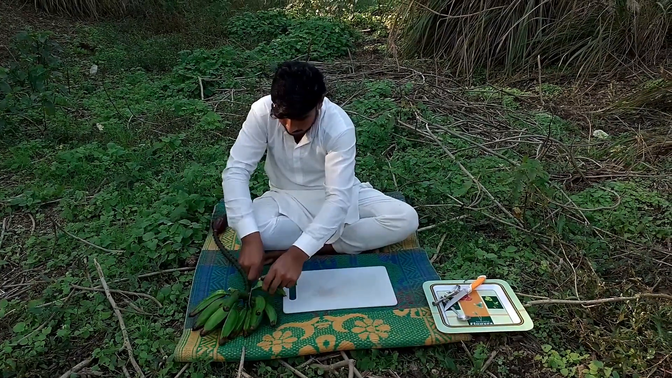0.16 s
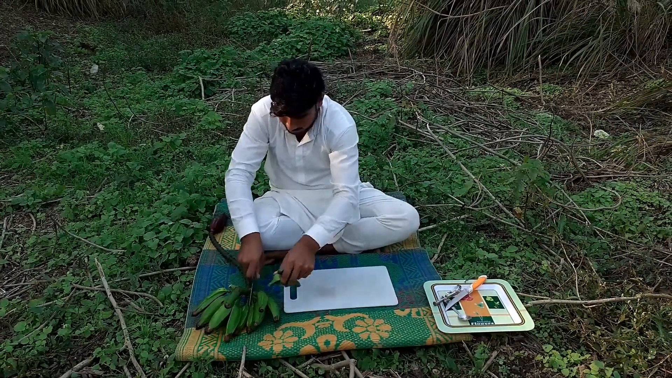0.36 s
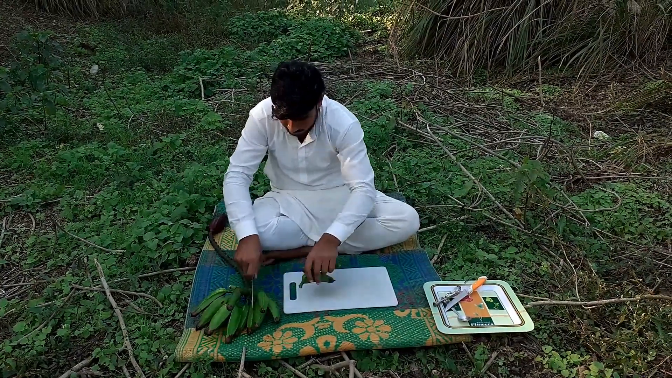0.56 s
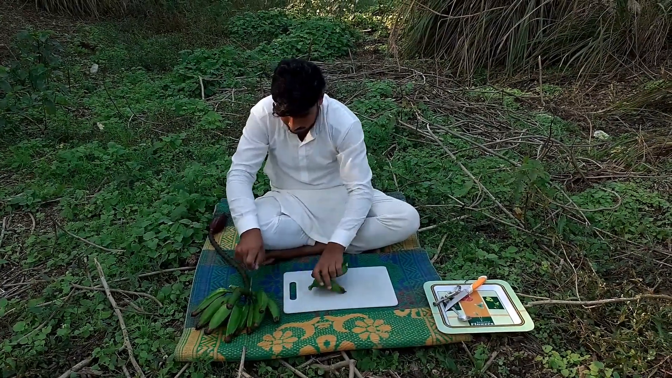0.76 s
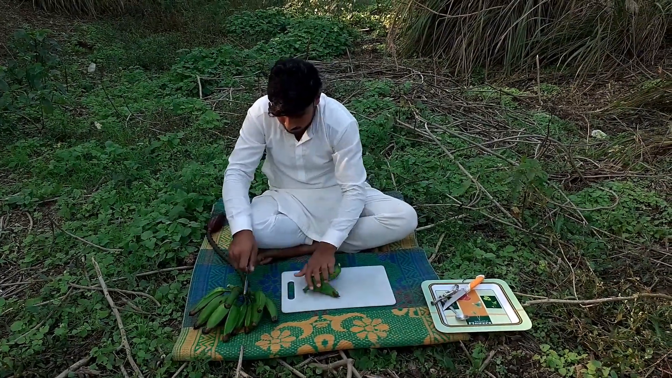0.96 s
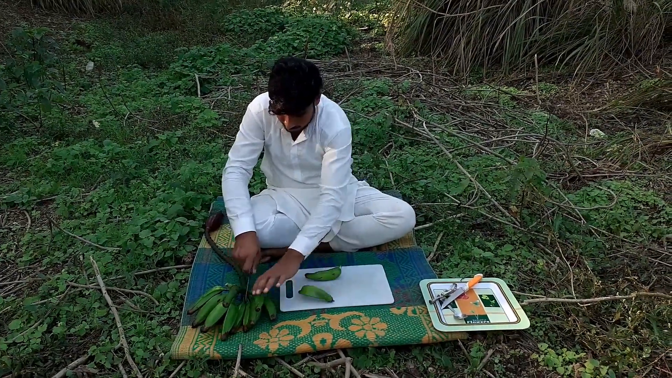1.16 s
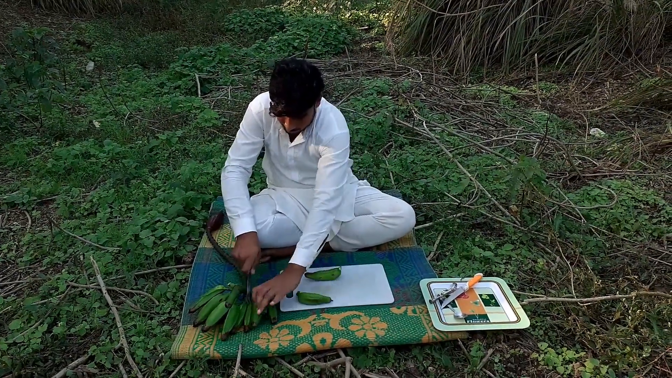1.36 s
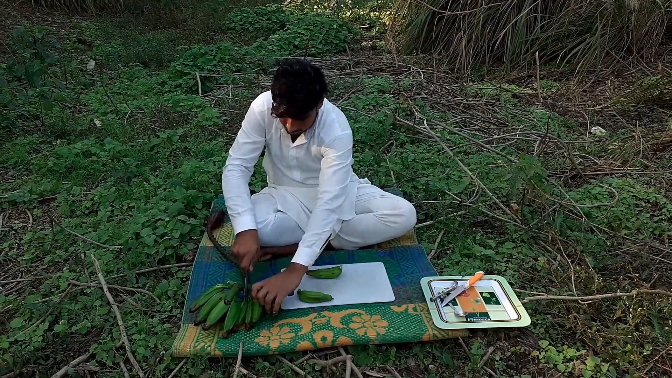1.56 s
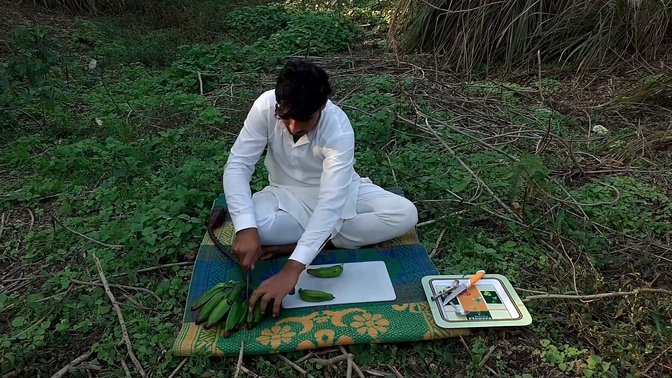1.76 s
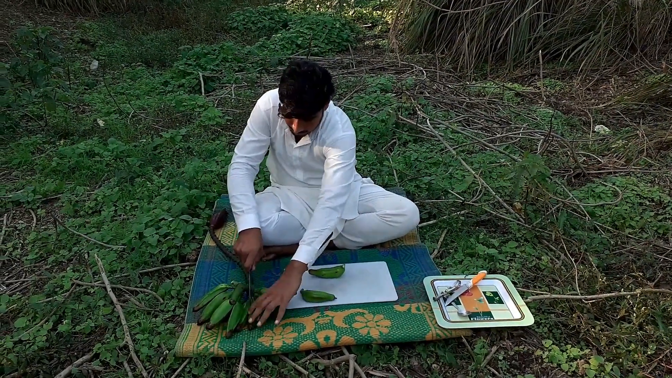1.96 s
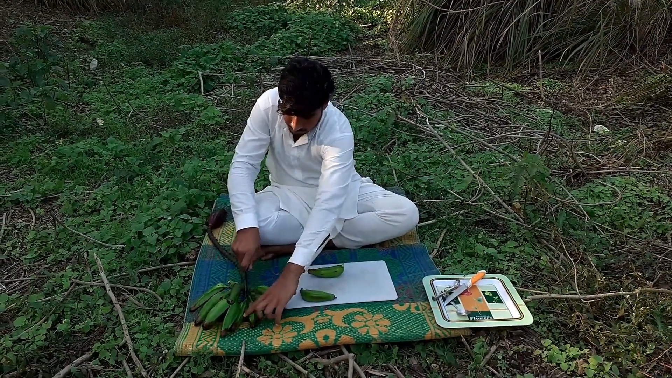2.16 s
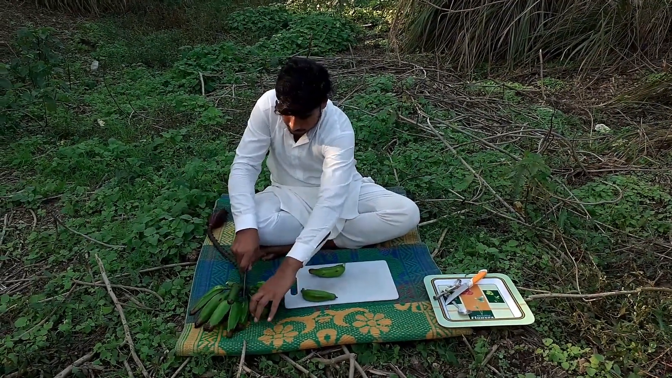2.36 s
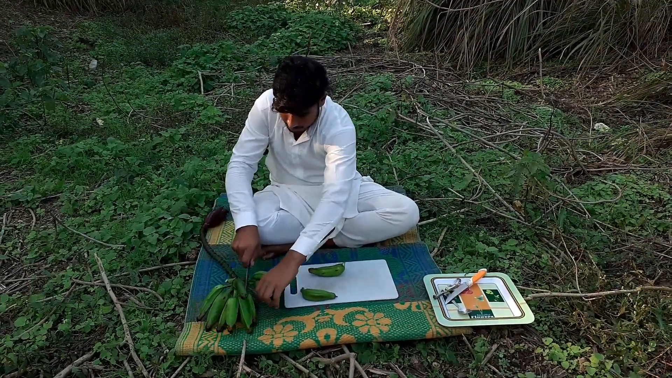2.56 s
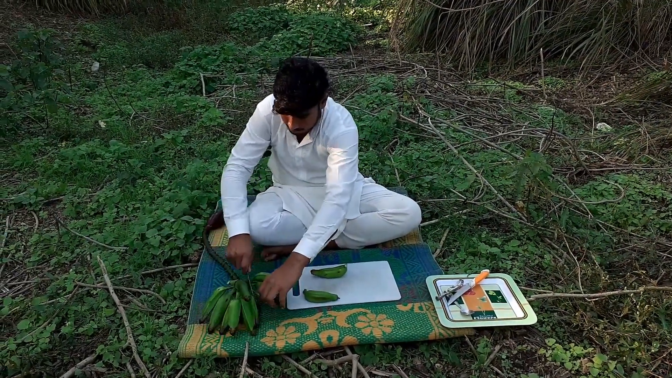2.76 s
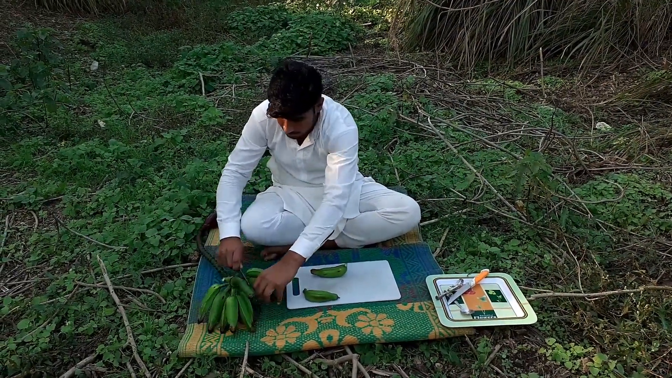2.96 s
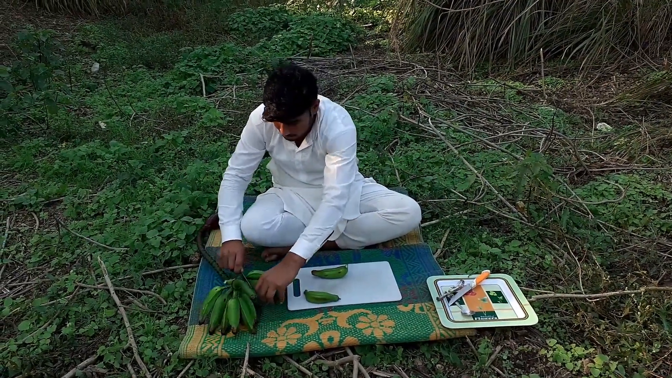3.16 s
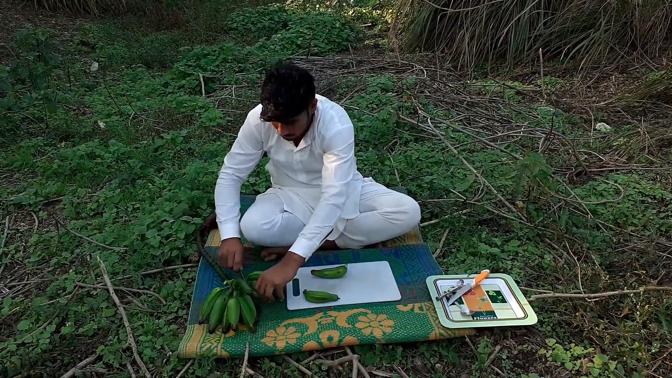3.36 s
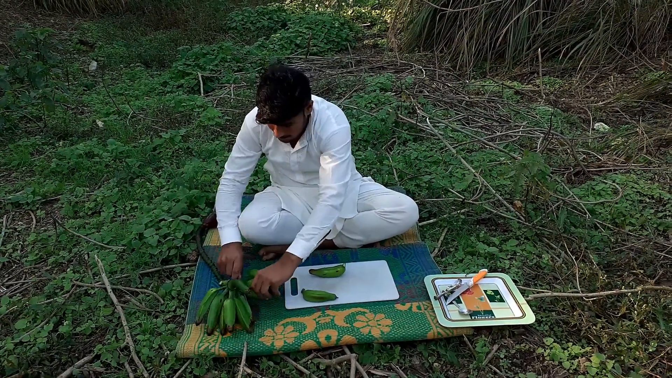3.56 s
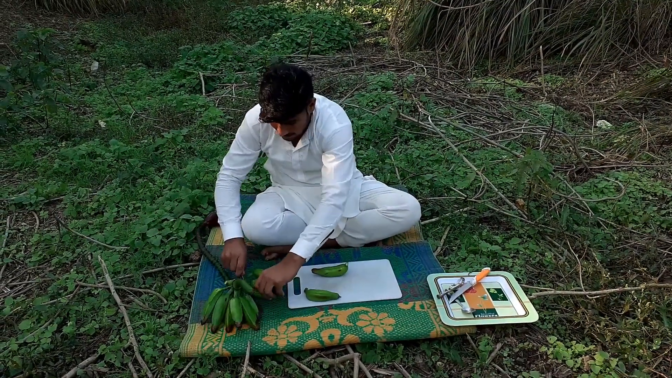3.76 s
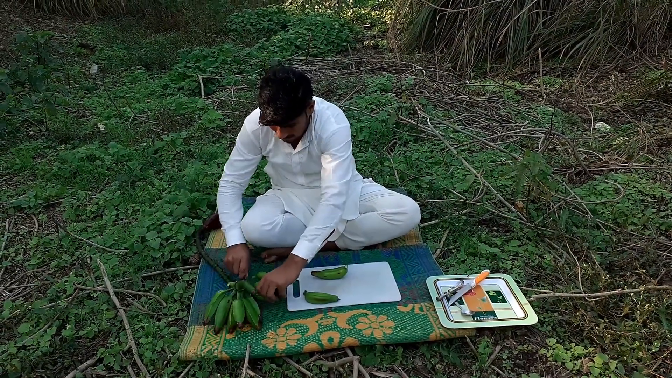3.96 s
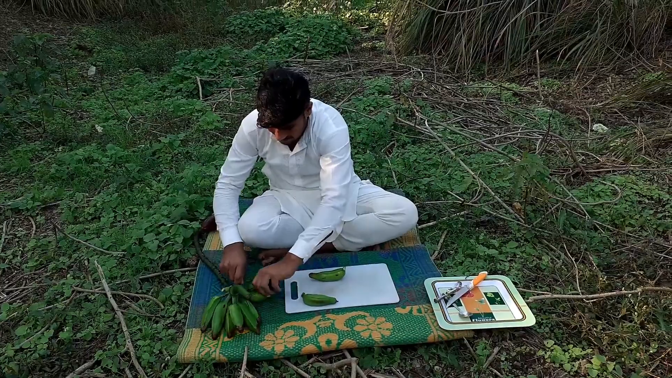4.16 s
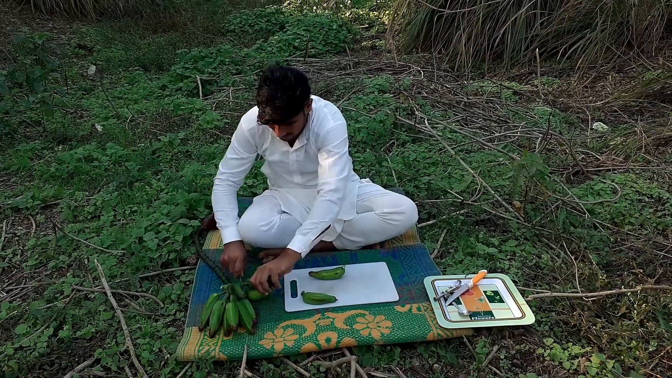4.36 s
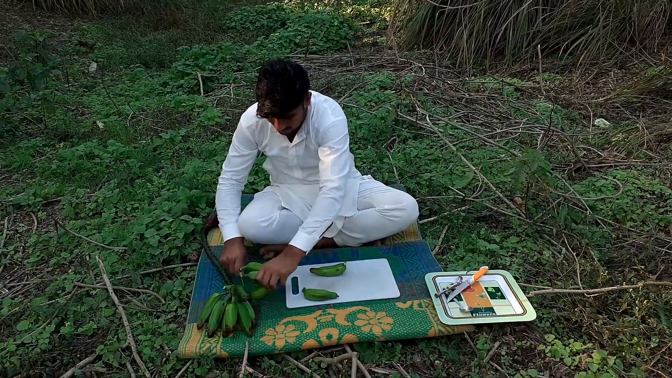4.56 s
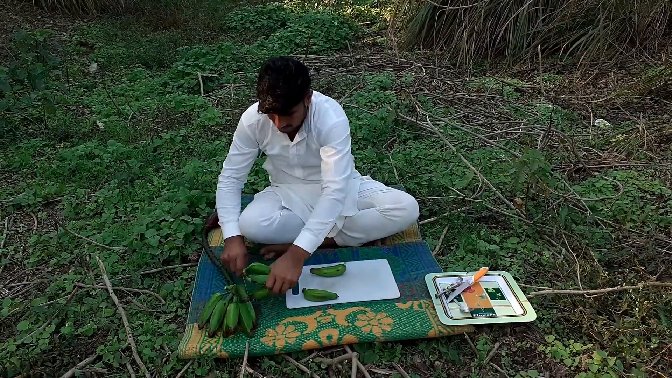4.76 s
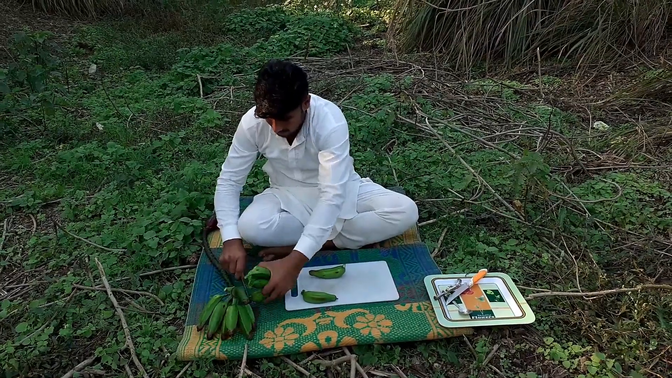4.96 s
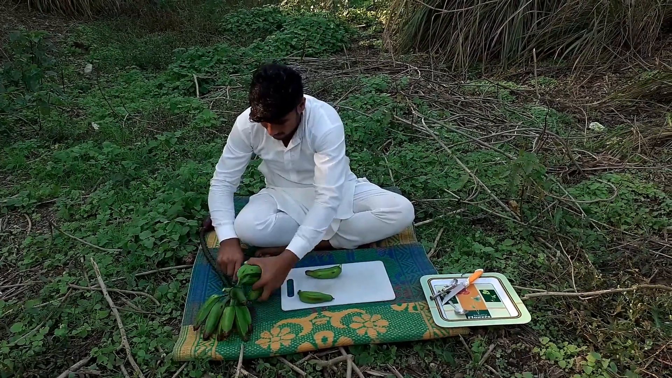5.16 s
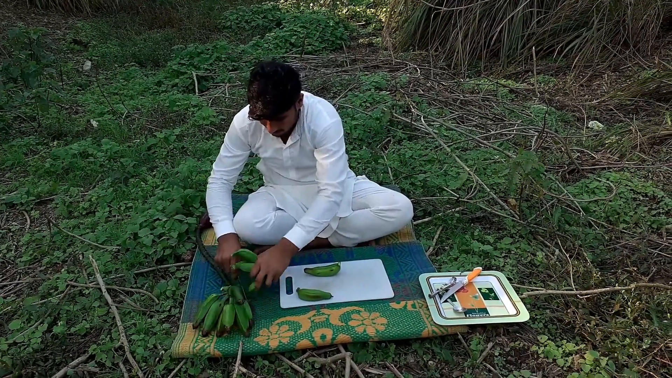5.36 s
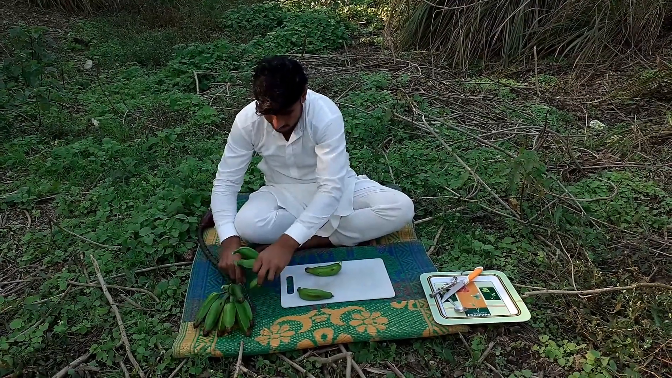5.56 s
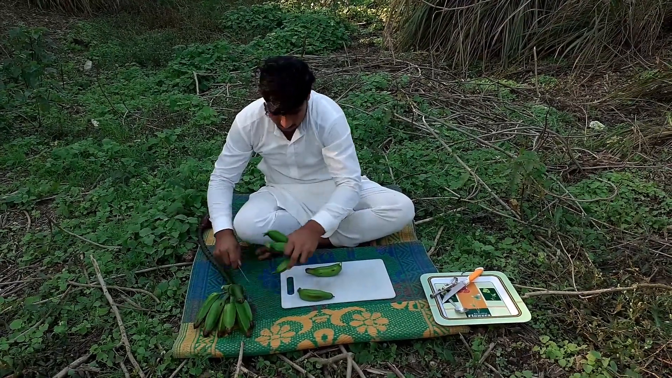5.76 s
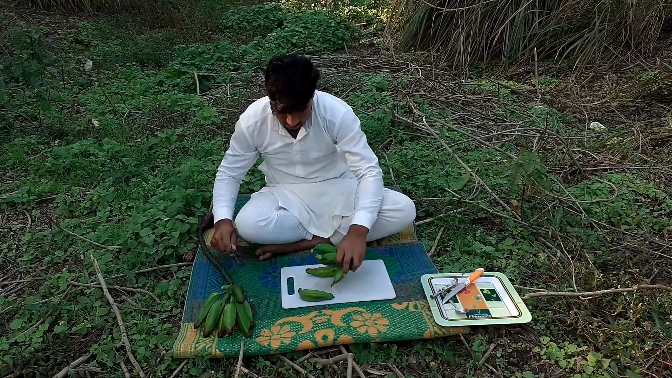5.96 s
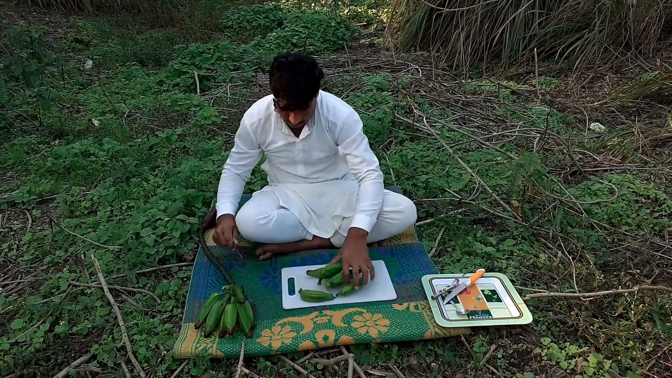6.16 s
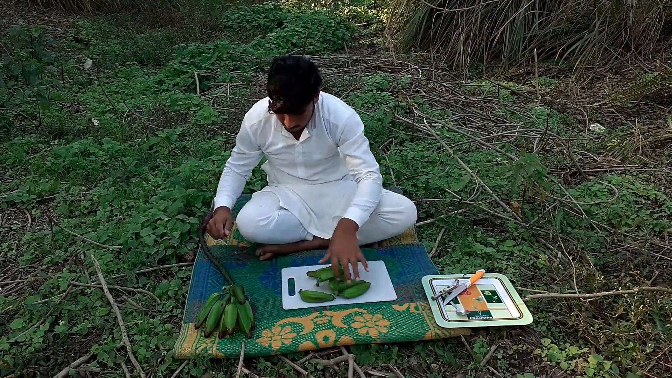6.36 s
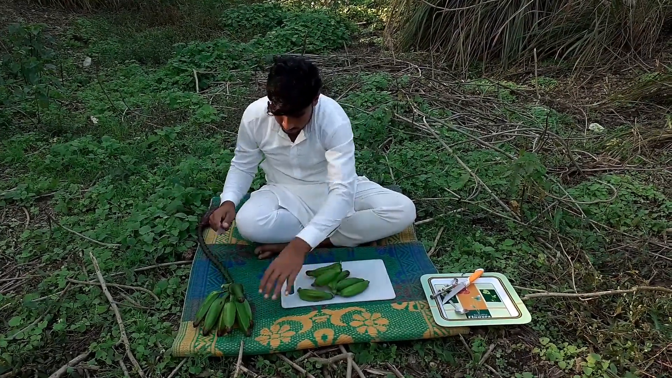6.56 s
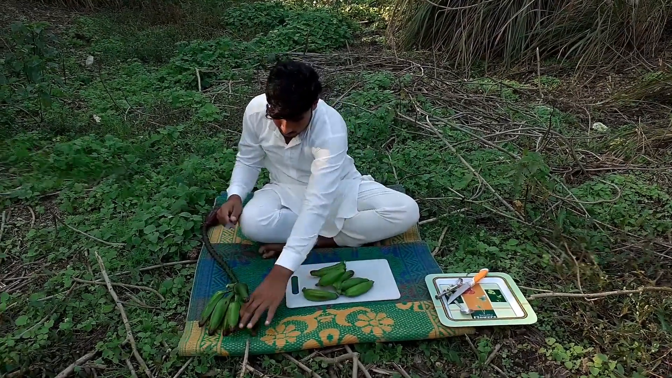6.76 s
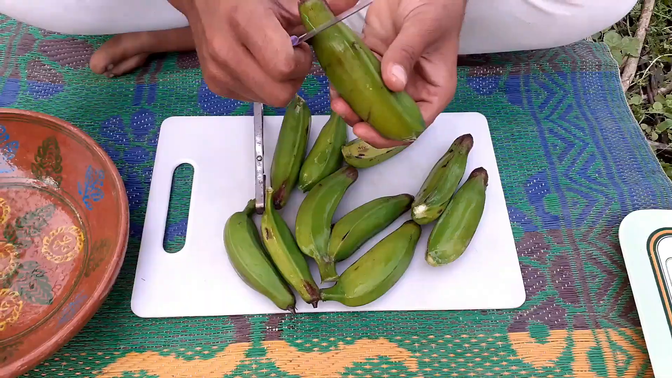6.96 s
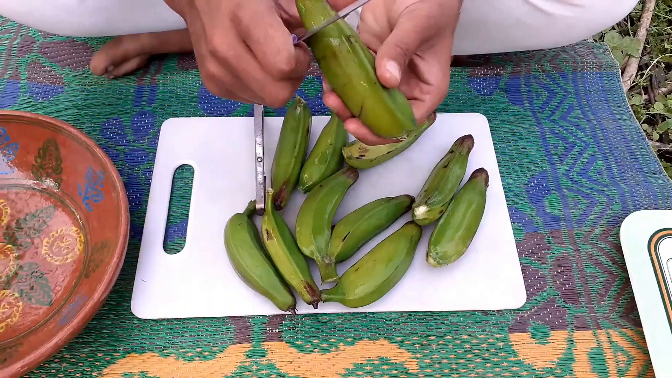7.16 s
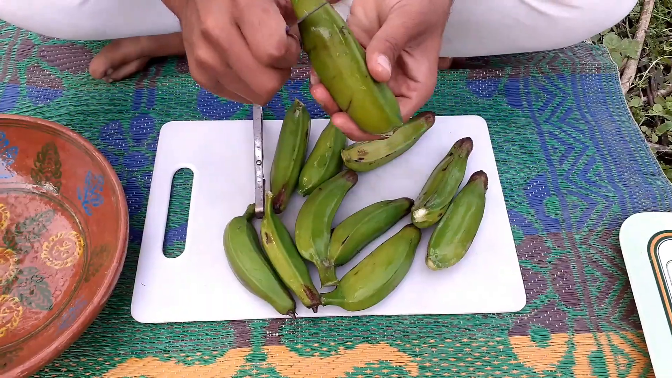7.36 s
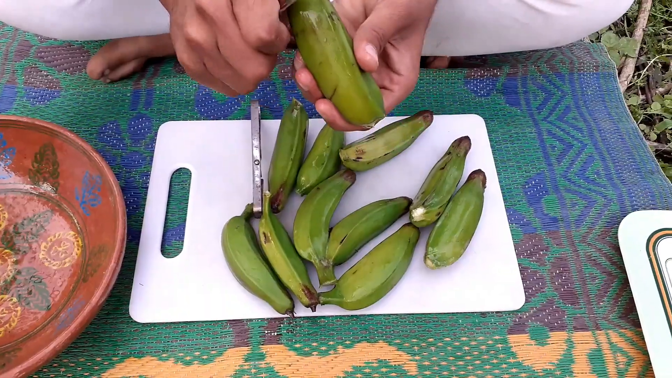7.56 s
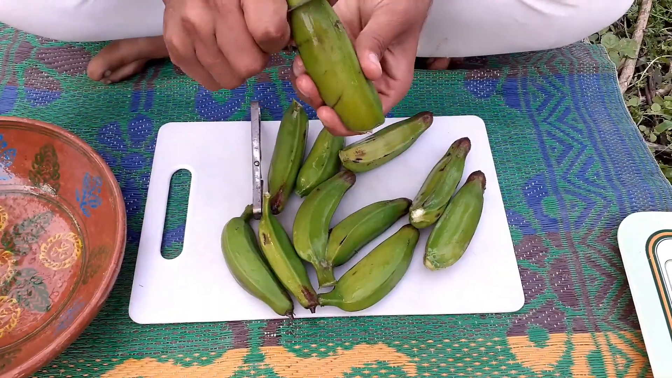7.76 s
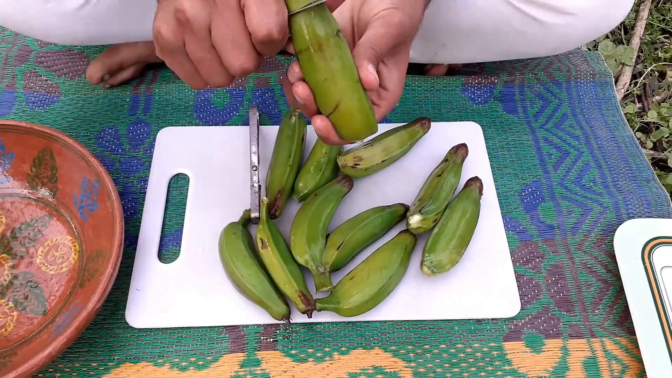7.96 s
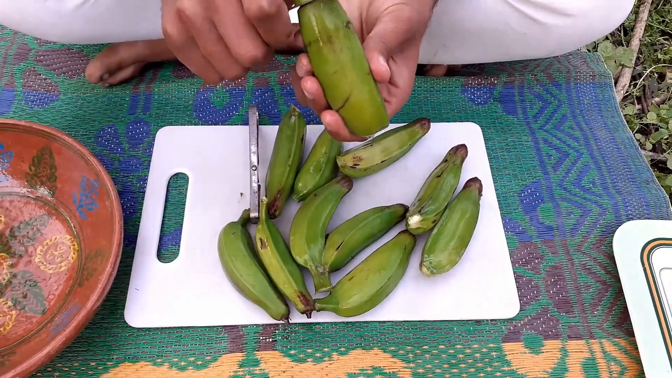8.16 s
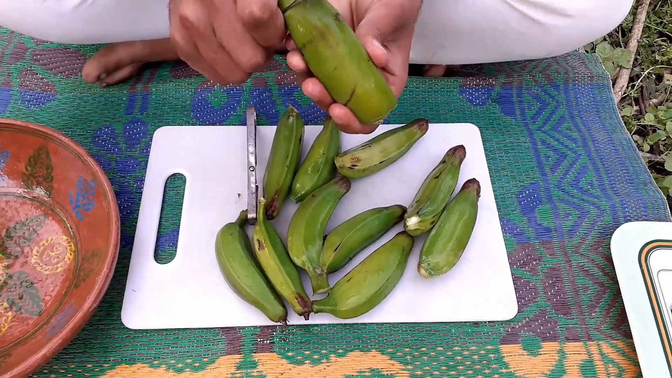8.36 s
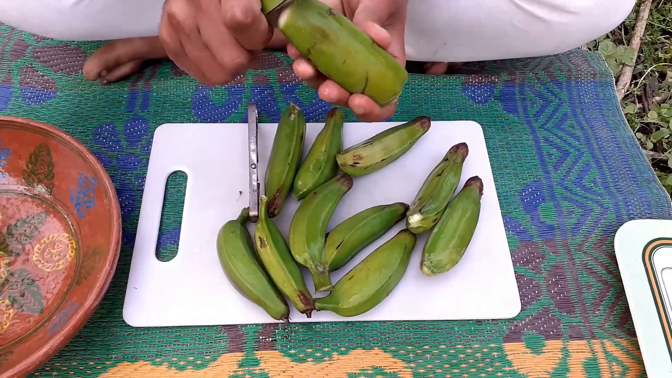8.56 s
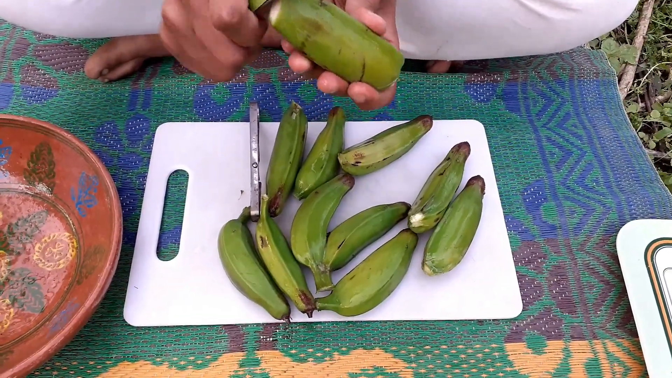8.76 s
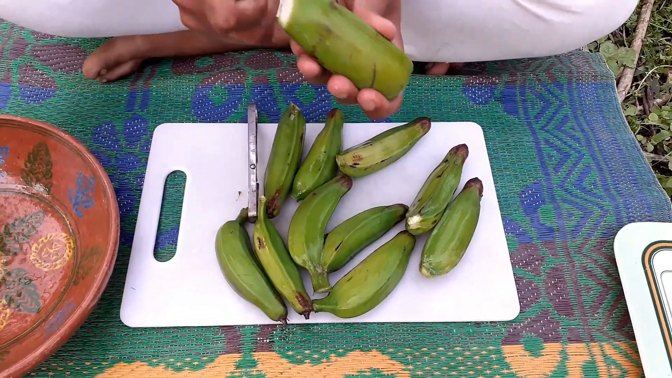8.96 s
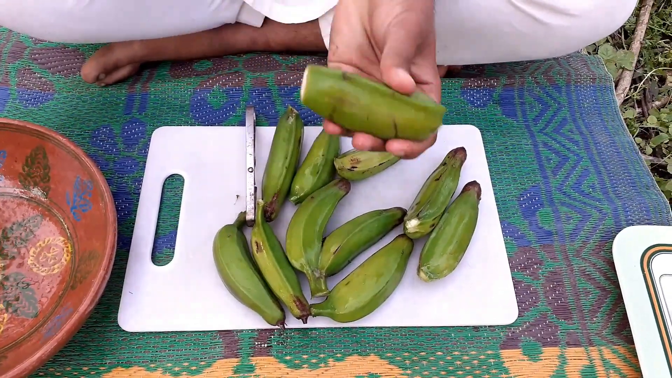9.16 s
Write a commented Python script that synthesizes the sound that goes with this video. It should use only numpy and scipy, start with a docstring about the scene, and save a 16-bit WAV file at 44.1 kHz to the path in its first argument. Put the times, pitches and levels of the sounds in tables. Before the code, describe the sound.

A man works silently outdoors, cutting bananas from a bunch. Dry fibre snaps and small high bell clinks come first, with dull knocks of fruit landing on plastic. Hoarse crow calls begin near the middle over rubbing and tearing, and more fruit lands. Close trimming follows: crisp clicks, faint steel ringing, jingling, two harsher caws, a hard snap and two soft round pats. Low traffic and a faint engine stay far behind; sparse tree echo.

```python
"""A far engine hums, a far crow caws and stalks rustle as a man outdoors cuts green bananas off a bunch.
A small bell clinks, fruit drops on a plastic board, near crows caw, and a knife trims one banana and rings.
Modal synthesis gives bell, board, blade, fruit and a brief thump; friction and clicks are filtered noise.
The calls are source and filter: rough harmonics weighted by a throat. Engine and drone are unsteady sines."""
import sys
import numpy as np
from scipy import signal
from scipy.fft import rfft, irfft, next_fast_len
from scipy.io import wavfile
from scipy.ndimage import uniform_filter1d

SR = 44100
rng = np.random.default_rng(int(sys.argv[2]) if len(sys.argv) > 2 else 0)


def elevation(decibels):
    """Turn decibel levels (scalar or array-like) into linear amplitude ratios."""
    levels = np.asarray(decibels, float)
    return 10 ** (levels / 20)


def digitize_waveform(pressure):
    """Quantize a signal to 16-bit integers and store it at the path in sys.argv[1].

    Rows of a 2-D input are taken as channels; values are limited to [-1, 1].
    """
    field = np.atleast_2d(pressure).T
    bounded = np.clip(field, -1, 1)
    quanta = np.round(bounded * 32767).astype(np.int16)
    wavfile.write(sys.argv[1], SR, quanta)


N = 405719


def read(points, hz):
    """Spectral envelope: a level interpolated along log frequency."""
    f, value = np.transpose(points)
    return np.interp(np.log(hz + 1), np.log(f + 1), value)


def evened(x):
    """Power normalisation: scales a signal to rms 1."""
    return x / np.sqrt(np.mean(x ** 2) + 1e-20)


def add(mix, s, sound):
    """Superposition: adds a sound to the mix at s seconds."""
    part = mix[..., round(s * SR):][..., :sound.shape[-1]]
    part += sound[..., :part.shape[-1]]


def drift(size, width):
    """Low-pass random process: noise averaged twice over width samples, at rms 1."""
    smooth = uniform_filter1d(rng.standard_normal(size), width)
    return evened(uniform_filter1d(smooth, width))


def placed(x, pan_db, lead):
    """Interaural differences: a level step, and the left port hears lead samples earlier."""
    size = next_fast_len(N + 4096)
    advance = np.exp(2j * np.pi * np.fft.rfftfreq(size) * lead)
    left = irfft(rfft(x, size) * advance, size)[:N]
    return np.array([left * elevation(pan_db / 2), x * elevation(-pan_db / 2)])


# Coherence of the two microphone ports: frequency_hz, likeness (0-1)
COHERENCE = [(60, .99), (500, 0.44), (1500, 0.22), (4000, 0.069), (15000, 0.22)]


def hiss(colour, patchy_db, pan_db, lead, size):
    """Partly coherent noise: random short-time spectra with drifting patches, at rms 1."""
    frames, hz = 4 * N // size + 5, np.fft.rfftfreq(size, 1 / SR)
    a, b, c, d, patches = rng.standard_normal((frames, len(hz), 5)).T
    patches = evened(uniform_filter1d(uniform_filter1d(patches, 8, 0), 10, 1))
    same = np.clip(read(COHERENCE, hz), -1, 1)[:, None]
    right = a + 1j * b
    advanced = right * np.exp(2j * np.pi * hz * lead / SR)[:, None]
    left = same * advanced + np.sqrt(1 - same ** 2) * (c + 1j * d)
    spectra = np.array([left * elevation(pan_db / 2), right * elevation(-pan_db / 2)])
    spectra *= elevation(read(colour, hz)[:, None] + patchy_db * patches)
    return evened(signal.istft(spectra, nperseg=size, noverlap=size * 3 // 4)[1][:, :N])


def ring(hz, db, t60, rise):
    """Modal decay: a sum of dying sines that swell with a time constant of rise seconds."""
    t = np.arange(SR // 2)[:, None] / SR
    modes = elevation(db - 60 * t / t60) * np.sin(2 * np.pi * hz * t)
    return (modes * (1 - np.exp(-t / rise))).sum(1)


def trees(x, t60):
    """Scattering: sparse decaying echoes from trunks and ground, other ones for each channel."""
    taps = np.zeros((2, SR // 2))
    at = np.arange(200, SR // 2 - 22, 22)
    at = at + rng.integers(0, 22, (2, len(at)))
    np.put_along_axis(taps, at, rng.choice([-1., 1.], at.shape), 1)
    taps *= elevation(-60 * np.arange(SR // 2) / SR / t60)
    return signal.oaconvolve(x[None], taps / np.linalg.norm(taps[0]), axes=1)[:, :N]


# The engine's wavering fundamental: time_s, pitch_hz, level_db
ENGINE = [(0.0, 74.3, -44.5), (0.1, 74.5, -50), (0.92, 71.9, -46), (3.66, 74.2, -53), (3.89, 72.4, -47.5),
          (4.59, 71.64, -54.5), (7.07, 74.6, -46), (9.2, 72.4, -49.5)]
# A fainter engine order: centre_hz, level_db
ENGINE_ORDERS = [(128, -72.5)]
# Far traffic rumble over time: time_s, level_db
TRAFFIC = [(0, -54.5), (2.5, -58), (3.3, -60.5), (3.8, -55.5), (4.5, -59.5), (6.7, -56.5), (7, -58.5),
           (8, -56.5), (9.2, -61)]
# Spectrum of the rumble: frequency_hz, level_db
TRAFFIC_COLOUR = [(25, -29), (50, 3), (100, 7), (140, -6), (250, -14), (600, -14.5), (1000, -16),
                  (1500, -81)]
# Spectrum of the still air: frequency_hz, level_db
AIR_COLOUR = [(190, -42), (270, -17), (887, -38.5), (1160, -30), (2760, -33.5), (3160, -35), (7710, -69),
              (9570, -39.5), (16000, -42)]


def distance():
    """Frequency modulation wavers the engine's lines; shaped noise makes the traffic and still air."""
    t = np.arange(N) / SR
    s, hz, db = np.transpose(ENGINE)
    turns = 2 * np.pi * np.cumsum(np.interp(t, s, hz)) / SR
    hum = np.sqrt(2) * elevation(np.interp(t, s, db)) * np.sin(turns)
    for hz, db in ENGINE_ORDERS:
        order_turns = 2 * np.pi * np.cumsum(hz + 3.25 * drift(N, 3000)) / SR
        hum += elevation(db + 4.9 * drift(N, 4000)) * np.sin(order_turns)
    rumble = hiss(TRAFFIC_COLOUR, 2.77, -6.0, 2.7, size=2048)
    rumble = rumble * elevation(np.interp(t, *np.transpose(TRAFFIC)))
    air = elevation(-67.5) * hiss(AIR_COLOUR, 2.56, -3.4, 1.4, size=1024)
    return placed(hum, -5.0, 3.5) + rumble + air


# Tones of a fuzzy whine: pitch_hz, relative_level_db
DRONE_TONES = [(715, -4), (763, 0), (815, -4)]
# The whine swells, then fades away: time_s, level_db
DRONE_OVER_TIME = [(0, -75.5), (.6, -65.5), (1.8, -66), (3, -75), (4.5, -75.5), (9.2, -136)]


def drone():
    """Amplitude modulation: random unsteadiness smears three tones into one band."""
    t = np.arange(N) / SR
    tones = 0
    for hz, db in DRONE_TONES:
        tones = tones + elevation(db) * (1 + .6 * drift(N, 1200)) * np.sin(2 * np.pi * hz * t)
    level = elevation(np.interp(t, *np.transpose(DRONE_OVER_TIME)))
    return placed(evened(tones) * level, -10.0, 14.3)


ATTACK_S, RELEASE_S, END_DB = 0.06, 0.082, -12  # a caw swells, holds and fades
ARCH_SKEW = .92  # exponent on time in the pitch arch


def outline(start, length, effort_db, start_db, arch):
    """Breath control: times, effort and pitch arch (top 1) of one caw; ends lie a share arch lower."""
    u = np.linspace(0, 1, num=24)
    t = u * length
    swell_db = start_db * np.clip(1 - t / ATTACK_S, 0, 1)
    fade_db = END_DB * np.clip(1 - (length - t) / RELEASE_S, 0, 1)
    return start + t, effort_db + swell_db + fade_db, 1 - arch * (2 * u ** ARCH_SKEW - 1) ** 2


def beak(hz, open_share, centre_hz):
    """Band-pass filtering: a half-shut beak passes one band and leaks more on the low side."""
    octaves = np.log2(hz / centre_hz)
    shut_db = -44  # gain an octave above the band when shut
    return shut_db * (1 - open_share) * octaves ** 2 * np.where(octaves < 0, .4, 1)


# A second, slow membrane bends pitch and level
FLUTTER_HZ, FLUTTER_BEND, FLUTTER_DEPTH = 68, .044, .15
FLUTTER_SLACK = 4  # flutter fades by this power as the pitch sags
ROUGH_SAMPLES = 60  # how slowly the noise on each harmonic varies


def caw(rows, throat, flutter_share, rough):
    """Source-filter voice: noise-widened harmonics of a fluttering pitch, weighted by the throat."""
    s, effort_db, *columns = np.transpose(rows)
    t = np.arange(s[0], s[-1], 1 / SR)
    hz, *mouth = (np.interp(t, s, c) for c in columns)
    flutter = 2 * np.pi * np.cumsum(FLUTTER_HZ * (1 + 0.04 * drift(len(t), 900))) / SR
    flutter_share = flutter_share * (hz / hz.max()) ** FLUTTER_SLACK
    bend = FLUTTER_BEND * flutter_share * (np.sin(flutter) + .6 * np.sin(2 * flutter))
    jitter = 0.015 * rough * drift(len(t), 200) + .008 * drift(len(t), 1500)
    hz = hz * (1 + bend + jitter)
    turns = 2 * np.pi * np.cumsum(hz) / SR
    edges = 1.8 - .9 * signal.windows.tukey(len(t), .5)  # hoarser as it starts and ends
    voice = 0
    for k in range(1, 11):
        smear = 1 - rough * edges + rough * edges * drift(len(t), ROUGH_SAMPLES)
        weight = elevation(throat(k * hz, *mouth) + 1.2 * drift(len(t), 1800))
        voice = voice + weight * smear * np.sin(k * turns)
    voice *= 1 + FLUTTER_DEPTH * flutter_share * np.cos(flutter + 0.068)
    level = elevation(np.interp(t, s, effort_db))
    return s[0], level * evened(voice) * signal.windows.tukey(len(t), .12)


# Far birds: start_s, length_s, effort_db, throat_band_hz, fall (share lost by pitch and band)
FAR_CALLS = [(0, 0.23, -56.5, 1760, 0.15), (1.303, 0.17, -56.5, 1780, 0.0071),
             (2.359, 0.16, -62, 1400, 0.083), (2.578, 0.44, -66, 1710, 0.06),
             (6.668, 0.23, -66, 1510, 0.086), (6.865, 0.26, -60.5, 1510, .2),
             (5.679, 0.072, -58, 1840, 0.0082), (8.499, 0.27, -58.5, 1640, 0.0042)]
# Two near crows: start_s, length_s, effort_db, top_pitch_hz, bite_above_3500_hz_db
NEAR_CALLS = [(3.135, 0.34, -45, 478, -1), (3.725, 0.3, -42.5, 471, 8), (4.435, 0.32, -44.5, 474, 0),
              (5.165, 0.35, -45, 465.2, 4), (5.99, .34, -45, 469.3, 6.5), (7.685, 0.26, -39.5, 518.6, 10),
              (8.255, 0.25, -39, 507.5, 14.5)]
# Throat of the first near crow: frequency_hz, level_db
FIRST_THROAT = [(460, -37), (920, -13.5), (1380, -10), (1850, -5), (2300, -14), (2800, -28), (3850, -33),
                (4250, -19.5), (4650, -29), (5200, -40)]
# Throat of the second near crow: frequency_hz, level_db
SECOND_THROAT = [(510, -45), (1020, -24), (1530, -1), (2040, -1), (2550, -14), (3100, -22), (5000, -24)]
# A clearer bird sliding down: time_s, effort_db, pitch_hz, throat_band_hz
SLIDING_CALL = [(5.44, -54, 467, 2023), (5.51, -50, 495, 1890), (5.56, -51, 469, 1860),
                (5.6, -50.5, 421, 1750), (5.64, -59.5, 364, 1736), (5.675, -56, 310, 1632)]
FIRST_BIRD_CAWS = 5  # the second crow gives the later near calls


def crows():
    """Direct-to-reverberant ratio: near birds are mostly direct, far ones one band with much echo."""
    near, far = np.zeros((2, N))

    def band(hz, centre_hz):
        """Single resonance: level falls with the square of the octaves off centre."""
        return -70 * np.log2(hz / centre_hz) ** 2

    for start, length, effort_db, centre_hz, fall in FAR_CALLS:
        s, db, arch = outline(start, length, effort_db, start_db=-7, arch=.08)
        sag = 1 + fall * (.5 - (s - start) / length)
        far_hz = 500 * arch * sag
        add(far, *caw(np.c_[s, db, far_hz, centre_hz * sag], band, .8, .45))
    for k, (start, length, effort_db, top_hz, bite_db) in enumerate(NEAR_CALLS):
        throat = FIRST_THROAT if k < FIRST_BIRD_CAWS else SECOND_THROAT
        s, db, arch = outline(start, length, effort_db, start_db=-17, arch=.11)
        # the beak opens and shuts over 82 ms
        opening = np.clip(np.minimum(s - start, start + length - s) / .082, 0, 1)
        # its band rises, from 1340 to 1750 Hz in the first call, in proportion to top pitch
        centre_hz = np.linspace(1340, 1750, len(s)) * top_hz / NEAR_CALLS[0][3]

        def colour(hz, *mouth):
            """Cascaded filters: throat, bite and beak add in decibels."""
            return read(throat, hz) + bite_db * (hz > 3500) + beak(hz, *mouth)

        add(near, *caw(np.c_[s, db, top_hz * arch, opening, centre_hz], colour, 1.05, .26))
    add(near, *caw(SLIDING_CALL, band, 1.1, .2))
    direct = placed(near + elevation(-3) * far, -3.5, 4.5)
    return direct + elevation(-6) * trees(near + elevation(4) * far, .26)


# Stalks, peel and cloth rubbing: time_s, level_db
RUBBING = [(0.0, -60.5), (0.4, -70), (1.5, -72), (3.1, -72), (3.35, -63), (3.5, -56.5), (3.79, -49.5),
           (4.2, -55.5), (4.4, -58), (4.88, -66.5), (5.23, -64.5), (5.44, -57.5), (5.6, -73), (6.7, -73),
           (6.95, -63), (7.53, -68), (7.74, -51.5), (8.06, -62.5), (8.4, -50.5), (8.72, -57.5),
           (8.9, -62.5), (9.2, -62.5)]
# A sleeve or leaf brushing briefly: time_s, peak_db, half_length_s
BRUSHING = [(0.164, -61.5, 0.048), (0.326, -65, 0.035), (1.775, -70.5, 0.065), (4.298, -54, 0.019),
            (5.753, -66, 0.024), (6.12, -73.5, 0.21), (7.43, -66, 0.072)]
# Spectrum of the lower rubbing layer: frequency_hz, level_db
RUBBING_LOW = [(120, 8), (250, -8.5), (600, -6.5), (1100, -1), (1600, 2.5), (3350, 3), (8100, 10),
               (9200, 1), (11000, -64)]
# Spectrum of the upper rubbing layer: frequency_hz, level_db
RUBBING_TOP = [(7000, -5.5), (9000, -2), (10400, -2), (12900, 4.5), (15900, -3)]


def rustle():
    """Stick-slip friction: hiss roughened by countless tiny slips that hit all frequencies at once."""
    t = np.arange(N) / SR
    level = elevation(np.interp(t, *np.transpose(RUBBING)))
    for s, db, half in BRUSHING:
        level = level + elevation(db) * np.exp(-((t - s) / half) ** 2)
    harder_db = 20 * np.log10(level) + 56  # above a reference level of -56 dB
    slips = elevation(4.5 * np.minimum(rng.exponential(1, N), 5))
    slips = slips * (rng.random(N) < 260 / SR)  # about 260 slips per second
    grain = 2 + 0.2 * signal.lfilter([1], [1, -np.exp(-1 / (0.002 * SR))], slips)
    low = hiss(RUBBING_LOW, 1.76, -11.0, 3.6, size=256) * elevation(6.5)
    # below 2400 Hz the rubbing speaks mainly when it is hard
    mid = signal.sosfiltfilt(signal.butter(2, 2400, fs=SR, output="sos"), low)
    low = low + mid * (elevation(-0.1 + 0.83 * harder_db) - 1)
    # harder rubbing is brighter
    top = hiss(RUBBING_TOP, 0.5, 0.25, 7.5, size=256) * elevation(2.5 + 0.36 * harder_db)
    return (low + top) * evened(grain) * level * elevation(1.7 * drift(N, 900))


# Stalk fibres tearing one after another: start_s, length_s, ticks_per_s, level_db, centre_hz
TEARING = [(0.088, 0.13, 42, -50, 9000), (3.414, .07, 88, -36, 7900), (3.424, .08, 75, -30, 990),
           (3.548, 0.8, 53, -35.5, 9000), (3.7, 0.34, 46.6, -42, 510), (4.79, 0.44, 29, -45.5, 9530),
           (5.199, .12, 52, -45, 10600), (5.319, 0.1, 110, -35, 11000), (7.697, .05, 90, -26, 5940),
           (7.778, 0.092, 42, -30.5, 5980), (7.899, 0.31, 29.7, -44, 5960), (8.297, 0.18, 92, -30, 7500),
           (8.498, 0.33, 22.6, -37, 7000)]


def tears():
    """Random point process: rows of small snaps with uneven gaps, sizes and colours."""
    rows = []
    for (start, length, rate, db, hz), luck in zip(TEARING, rng.random((len(TEARING), 50, 3))):
        s = start + np.cumsum(.4 + 1.2 * luck[:, 0]) / rate
        tick_db = db + 12 * (luck[:, 1] - .5)
        tick_hz = hz * 2 ** (luck[:, 2] - .5)
        ticks = np.c_[s, tick_db, tick_hz, np.full(len(s), .012)]
        rows += list(ticks[s < start + length])
    return rows


# Fibres snapping and the knife ticking; the rows at 6.8214 and 6.836 s are only a brief noise burst:
# start_s, peak_db, centre_hz, t60_s
CLICKS = [(.11, -37, 7000, .015), (0.125, -29.5, 6940, 0.028), (0.1397, -26.5, 7300, 0.018),
          (.164, -38, 1500, 0.016), (0.2823, -37, 9500, 0.015), (.328, -42.5, 750, 0.036),
          (.351, -44.5, 797, 0.022), (.822, -43, 4000, .015), (1.2075, -36.5, 3400, 0.024),
          (3.463, -33, 6350, 0.036), (3.481, -14.5, 3940, 0.019), (3.4934, -24, 4800, 0.042),
          (3.965, -25, 11810, 0.01), (4.272, -25, 9230, 0.023), (4.2838, -26, 5080, 0.16),
          (4.2912, -21, 7480, 0.077), (4.3027, -35, 7200, 0.024), (4.337, -28, 12430, 0.034),
          (5.2667, -37, 11100, .015), (5.2976, -29, 11000, 0.0089), (5.3275, -24.5, 8050, 0.019),
          (5.436, -30.5, 6450, 0.055), (5.4535, -27.5, 8330, 0.02), (5.728, -32, 6850, 0.021),
          (6.031, -43, 1840, 0.034), (6.104, -47, 4100, 0.018), (6.165, -39, 3980, 0.029),
          (6.3215, -45.5, 3500, .015), (6.8214, -34.5, 3620, 0.17), (6.836, -28, 6400, 0.06),
          (7.5916, -12.5, 3880, 0.0037), (7.5944, -14, 4190, 0.033), (7.621, -24.5, 4200, 0.12),
          (7.7582, -17, 6250, 0.058), (7.8685, -12.5, 4460, 0.015), (8.29, -23.5, 3930, 0.056),
          (8.39, -24.5, 6000, 0.03), (8.41, -23, 10500, .015), (8.4205, -21.5, 10840, 0.043),
          (8.4425, -25, 9000, .015), (8.6004, -33, 5380, 0.019), (8.8015, -33, 9910, .015),
          (8.817, -32, 9000, .012), (8.83, -16, 8000, 0.017), (8.843, -13.5, 8500, 0.015),
          (8.856, -26, 8500, 0.02), (8.8674, -10, 4860, 0.019)]


def clicks(rows, slope_db):
    """Impulsive excitation: a click of noise dying in milliseconds, coloured around its own centre."""
    out, t = np.zeros((2, N)), np.arange(2048) / SR
    f = np.fft.rfftfreq(2048, 1 / SR)
    for (s, peak_db, hz, t60), noise in zip(rows, rng.standard_normal((len(rows), 2, 2048))):
        colour = elevation(slope_db * np.log2((f + 50) / hz) ** 2)
        decay = elevation(-60 * t / np.clip(t60, .002, .1)) * (1 - np.exp(-t / 0.0001))
        burst = irfft(rfft(noise) * colour) * decay
        burst /= abs(burst[0]).max()
        left = elevation(-3) * (0.24 * burst[0] + 1.0 * burst[1])
        right = np.roll(burst[0], shift=5)
        add(out, s, elevation(peak_db) * np.array([left, right]))
    return out


# The bell jiggling faintly: start_s, length_s, strokes_per_s, level_db
JIGGLES = [(4.66, 0.52, 20, -61), (6.921, .35, 15.5, -59), (7.45, 0.82, 19.2, -50), (8.308, .4, 18, -51.5),
           (8.871, .22, 25.7, -55)]


def jingles():
    """Random point process: rows of light clapper strokes at uneven gaps."""
    rows = []
    for (start, length, rate, db), luck in zip(JIGGLES, rng.random((len(JIGGLES), 20, 3))):
        s = start + np.cumsum(.3 + 1.4 * luck[:, 0]) / rate
        strokes = np.c_[s, db + 6 * (luck[:, 1] - .5), .5 + .5 * luck[:, 2]]
        rows += list(strokes[s < start + length])
    return rows


# Clapper strokes: start_s, level_db, lower_share (of the two lower hum modes, 0-1)
STROKES = [(0.537, -44, 0.24), (0.802, -39.5, 0.67), (0.935, -45, 0.3), (1.067, -47.5, 1),
           (1.1752, -35, 0.5), (1.3423, -44, 0.4), (1.611, -47, 0.3), (2.0332, -39, 0.4), (2.223, -53, 0.7),
           (2.4796, -39, 0.46), (2.8955, -41.5, 0.8), (4.3318, -42, 0.96), (4.407, -37.5, 1),
           (4.434, -48, 0.6), (4.5113, -33.5, 0.83), (4.5453, -42, 0.8), (4.6068, -40, 1),
           (4.879, -46, 0.55), (5.089, -53, 0.98), (6.972, -51, 0.4), (7.043, -46, 0.5), (7.514, -46, 0.3),
           (7.929, -54, 0.02), (8.5461, -39, 0.49)]
# Bell modes, the three close hum modes first: pitch_hz, level_db, t60_s
BELL_MODES = [(2665, -10, .3), (2705, -7, .27), (2775, -10, .4), (2520, -30, .15), (5010, -28, .3),
              (5295, -32, .2), (6760, -24, .25), (7585, -29, .2), (8390, -25, .15)]


def bell():
    """Modal excitation: each stroke is shared between close hum modes; the swinging bell wavers."""
    out, (hz, db, t60) = np.zeros(N), np.transpose(BELL_MODES)
    strokes = STROKES + jingles()
    chances = rng.standard_normal((len(strokes), len(hz) - 3))
    for (s, level_db, lower), luck in zip(strokes, chances):
        share = np.clip([lower, lower, 1 - lower], .02, 1)
        stroke_db = np.r_[20 * np.log10(share), 3 * luck]  # upper modes wake by chance
        add(out, s, ring(hz, db + stroke_db + level_db, t60, 0.0015))
    out *= elevation(2.2 * drift(N, 300))
    return placed(out, -4, 4.5) + elevation(-4) * trees(out, .3)


# Fruit landing on the board; the last two rows, at 6.82 and 6.84 s, are only a brief thump:
# start_s, peak_db, hardness (0-1), pitch_factor
THUMPS = [(0.742, -23, 0.6, 0.97), (.76, -33, 0.1, 1.05), (0.806, -25, 0.6, 0.88), (0.821, -12, 0.17, 1.04),
          (0.839, -24, 0.3, 1.013), (0.8823, -33, 0, .95), (0.928, -29, 0.8, 0.88),
          (1.209, -22, 0.97, 0.98), (1.222, -28, 0.2, 1.01), (1.29, -40.5, 0.65, 1.02),
          (6.143, -14, 0.74, 1), (6.152, -17.5, 0, 1.12), (6.163, -16.5, 1, 0.927), (6.186, -19, 0.3, 0.9),
          (6.293, -36.5, 0.02, 0.75), (6.322, -24.5, 0.22, 0.99), (6.822, -31, 0.85, 1.08),
          (6.84, -38.5, 0.75, 1.33)]
# Board modes, which also colour the brief thump: pitch_hz, level_db, t60_s
BOARD_MODES = [(115, -1, 0.075), (160, -2, 0.06), (241, 1, 0.06), (305, 4, 0.045), (460, -1, 0.045),
               (540, -6, 0.055), (605, -4, 0.045), (725, -9, .04), (880, -7, 0.026), (1353, -24, 0.025)]


def thumps():
    """Contact stiffness: a low push drives the modes, and a harder one wakes the higher modes."""
    out, (hz, db, t60) = np.zeros(N), np.transpose(BOARD_MODES)
    chances = rng.standard_normal((len(THUMPS), len(hz)))
    high_pass = signal.butter(2, 110, "high", fs=SR, output="sos")
    for (s, peak_db, hard, pitch), luck in zip(THUMPS, chances):
        tilt_db = 12 * (hard - .5) * np.log2(hz / 300)
        mode_hz = hz * pitch * (1 + 0.034 * luck[::-1])
        thud = ring(mode_hz, db + tilt_db + 1.76 * luck, t60, 0.2 / hz)  # low modes swell more slowly
        t = np.arange(len(thud)) / SR
        # a dull scuff; after a landing, the fruit rolling and settling
        scuff = drift(len(t), 40) * elevation(-24 - 60 * t / .22) * (1 - np.exp(-t / .012))
        thud += scuff * abs(thud).max()
        thud = signal.sosfilt(high_pass, thud)  # a small board moves no deep bass
        add(out, s, -elevation(peak_db) * thud / abs(thud).max())
    return placed(out, -4.7, 4.5) + elevation(-17) * trees(out, .12)


# Ticks on the blade: start_s, level_db, pitch_factor, lowest_mode_damping_db (by a finger),
# length_s (until the fruit or hand stops it)
BLADE_TICKS = [(3.842, -38, 1.02, -12, .16), (7.338, -43, 1.0, -3, .15), (8.147, -48, 1.0, 0, .065),
               (8.222, -39, 1.0, -7, .05)]
# Blade modes: pitch_hz, level_db, t60_s
BLADE_MODES = [(3133, -1, 1.2), (8650, 5.5, 0.17), (10050, -3, 0.13), (11600, -14, .08), (12150, -13, .08)]


def blade():
    """Damped plate modes: the knife's ticked steel rings until touch stops it."""
    out, (hz, db, t60) = np.zeros(N), np.transpose(BLADE_MODES)
    for s, level_db, pitch, damping_db, length in BLADE_TICKS:
        mode_db = db + level_db + damping_db * (hz == hz.min())
        steel = ring(hz * pitch, mode_db, t60, 0.0003)
        t = np.arange(len(steel)) / SR
        add(out, s, steel * np.clip(1 + (length - t) / .015, 0, 1))  # stopped over 15 ms
    return placed(out, -6, 6.2)


# The blade bursting through the tip in three jerks: start_s, level_db
JERKS = [(8.83, -33), (8.843, -21), (8.8683, -7.5)]
# Modes of the fruit: pitch_hz, level_db, t60_s
FRUIT_MODES = [(800, -22, .016), (1690, -13, .014), (2800, -9, .011), (4400, 0, .015), (5750, -9, .011),
               (8900, -8, .009)]


def cut():
    """Impulse response: the fruit's modes ring briefly as the last fibres give."""
    out = np.zeros(N)
    for s, db in JERKS:
        add(out, s, elevation(db) * ring(*np.transpose(FRUIT_MODES), 0.00062))
    return placed(out, -6, 5)


# The held fruit knocked softly: start_s, level_db, pitch_hz, t60_s
KNOCKS = [(9.043, -34, 294, 0.051), (9.115, -27, 295, 0.041)]


def pats():
    """Single-mode resonance: each soft knock gives one round, short note."""
    out = np.zeros(N)
    for s, level_db, hz, t60 in KNOCKS:
        add(out, s, ring(hz, level_db, t60, 0.0036))
    return placed(out, -6.5, 3.9)


def scene():
    """Linear superposition: all sources sum at the microphone."""
    background = distance() + drone() + crows()
    rubs_and_clicks = rustle() + clicks(tears(), -4) + clicks(CLICKS, -5.0)
    return background + rubs_and_clicks + bell() + thumps() + blade() + cut() + pats()


def low_pass(x):
    """Removes everything above the highest recorded frequency."""
    return signal.sosfilt(signal.butter(12, 16960, fs=SR, output="sos"), x)


def record(dry):
    """Band limiting: a linear-phase low-pass at 16.2 kHz finishes the mix."""
    edge = signal.firwin(255, 16200, window=("kaiser", 7), fs=SR)
    finished = signal.oaconvolve(dry, edge[None], "same")
    return low_pass(finished)


dry = scene()
out = record(dry)
digitize_waveform(out)
```